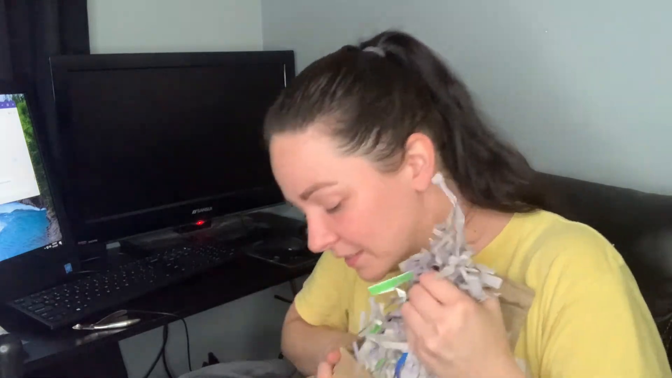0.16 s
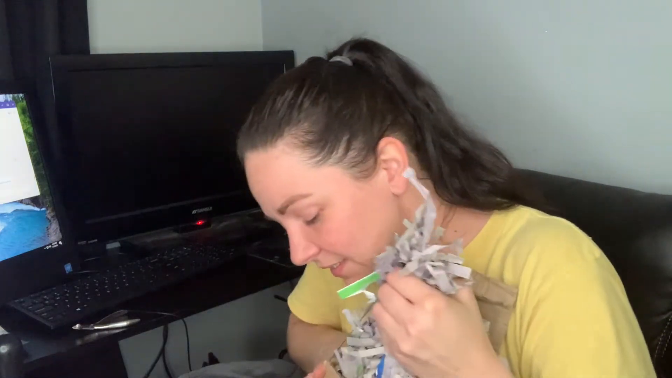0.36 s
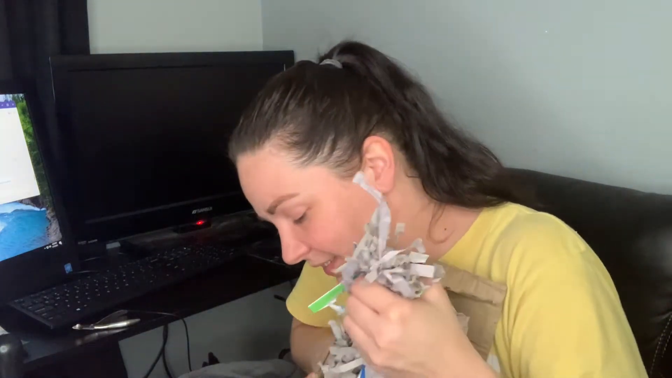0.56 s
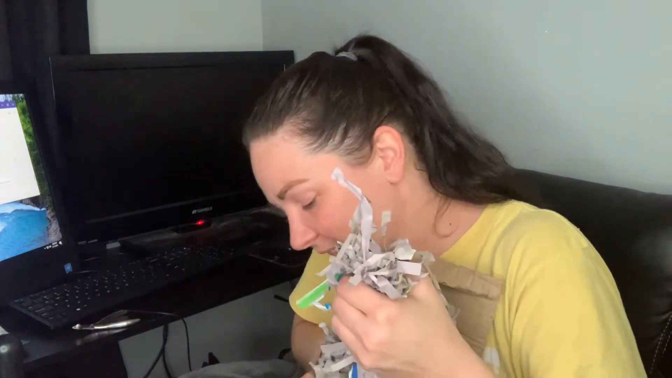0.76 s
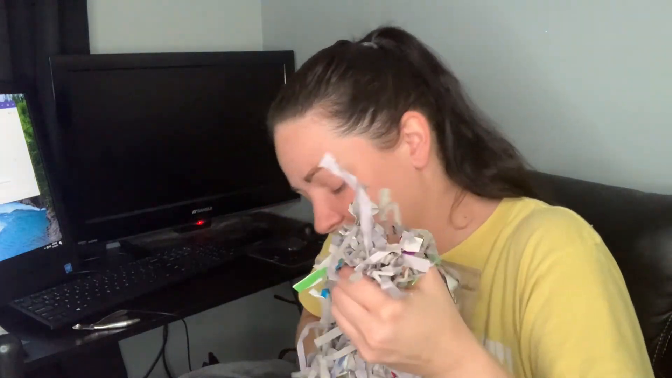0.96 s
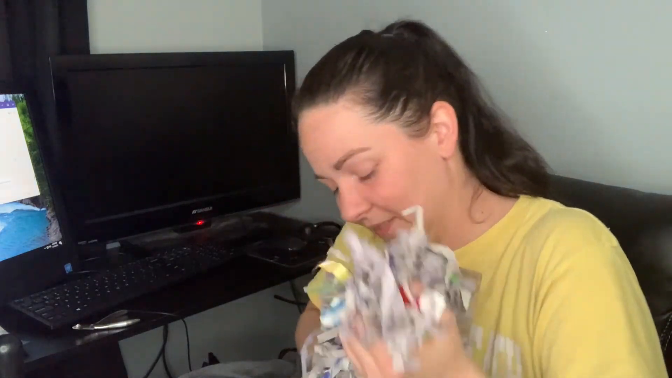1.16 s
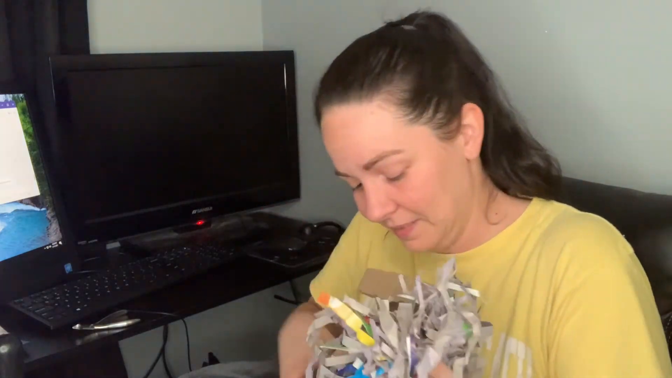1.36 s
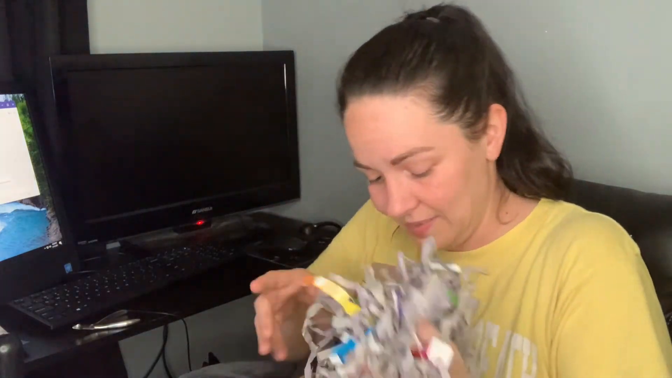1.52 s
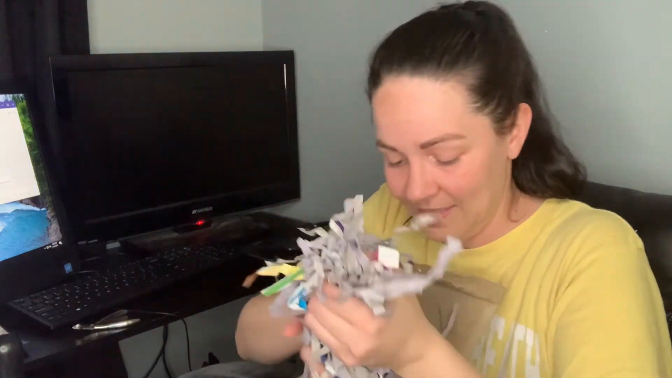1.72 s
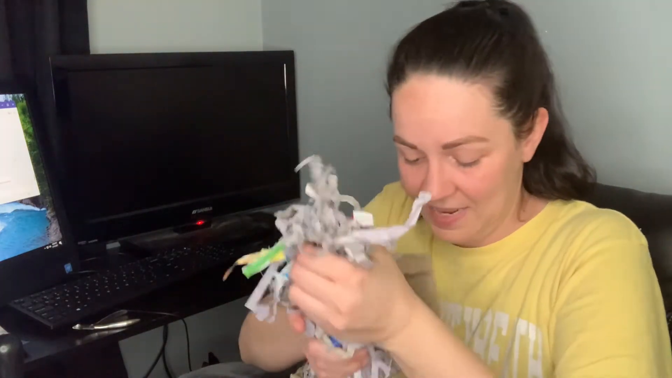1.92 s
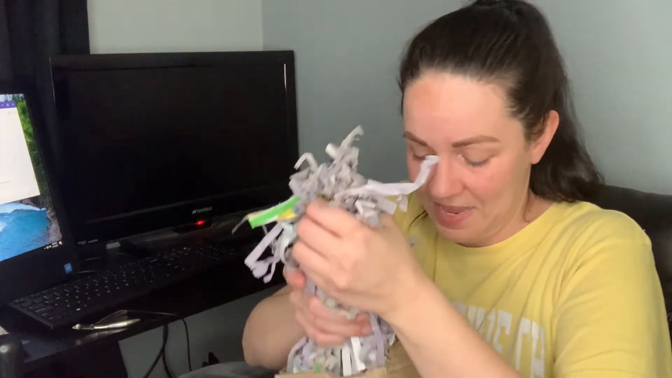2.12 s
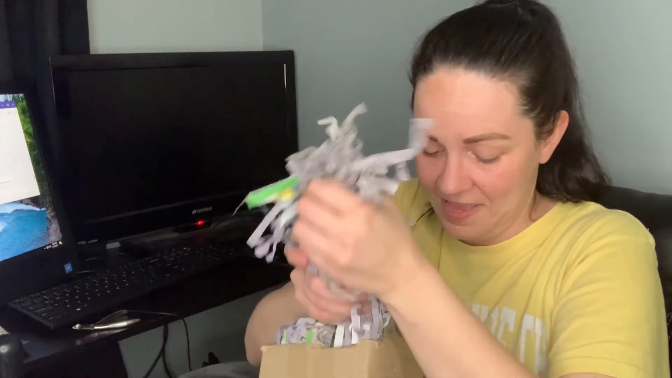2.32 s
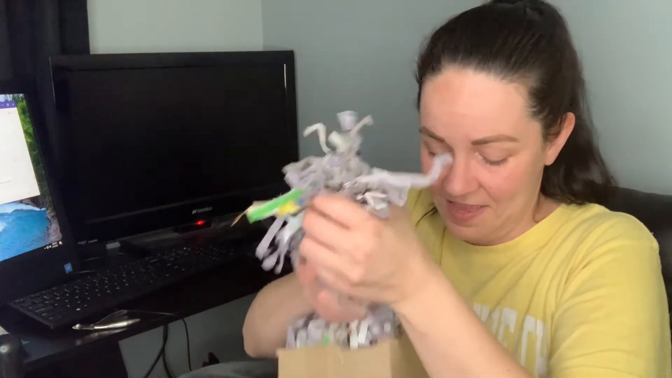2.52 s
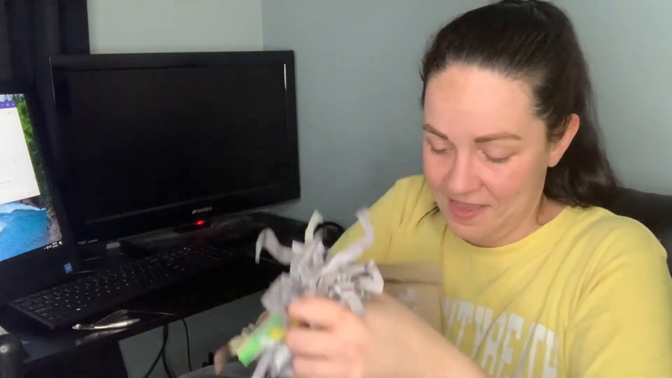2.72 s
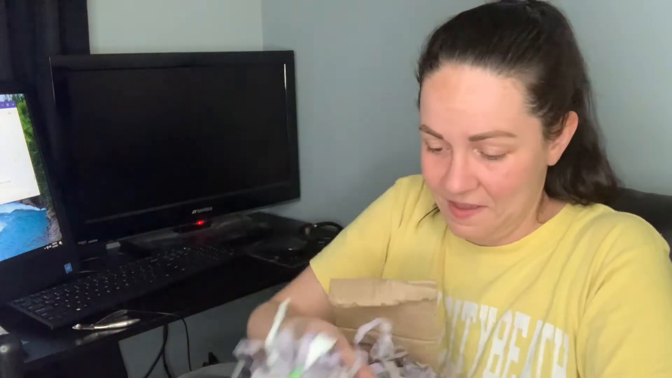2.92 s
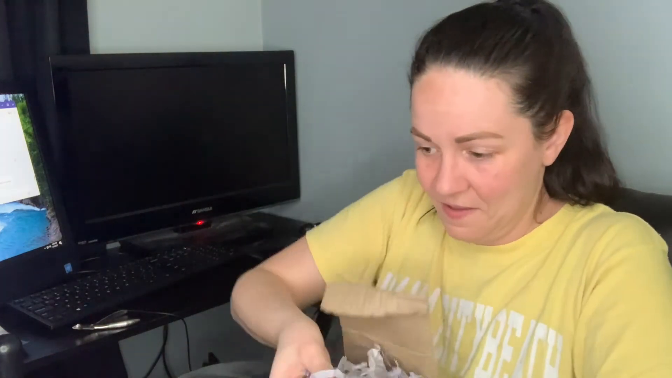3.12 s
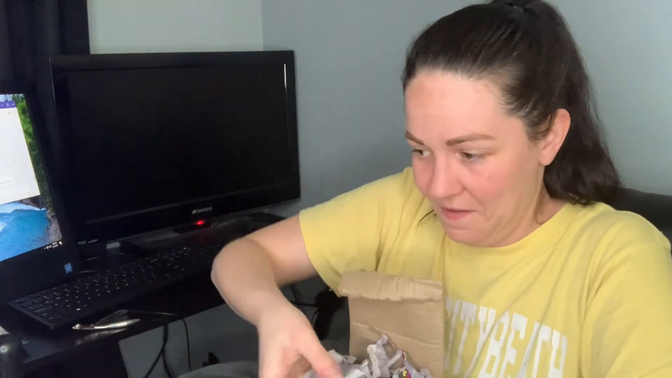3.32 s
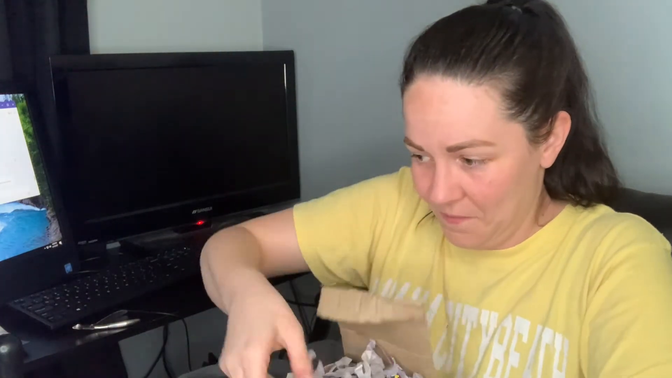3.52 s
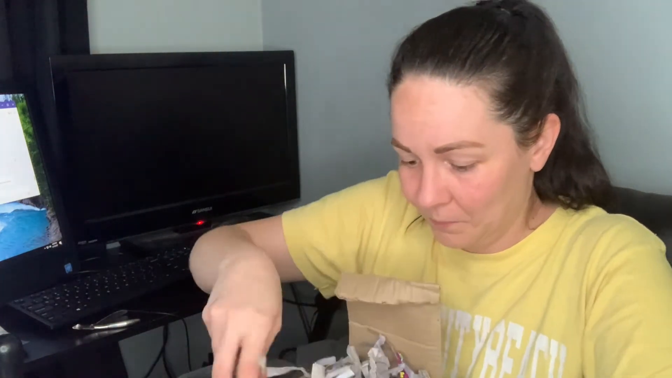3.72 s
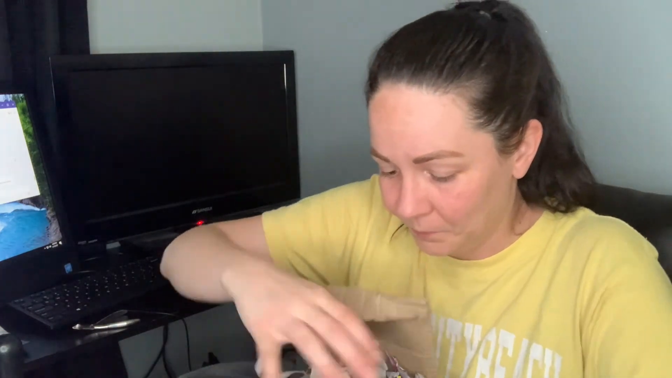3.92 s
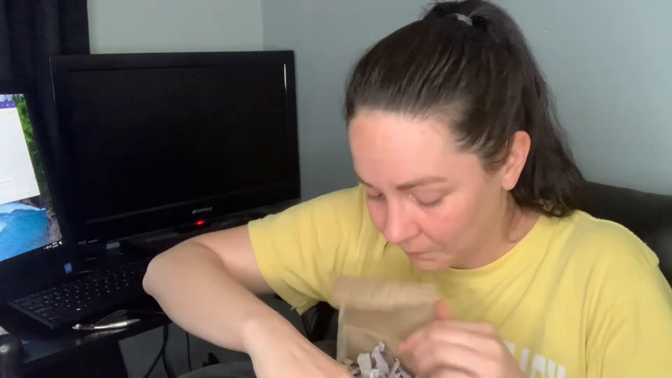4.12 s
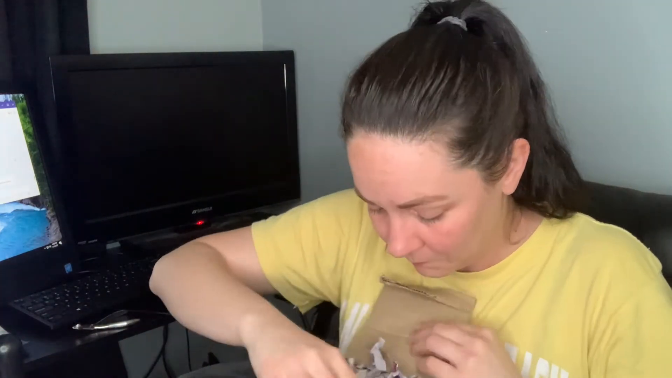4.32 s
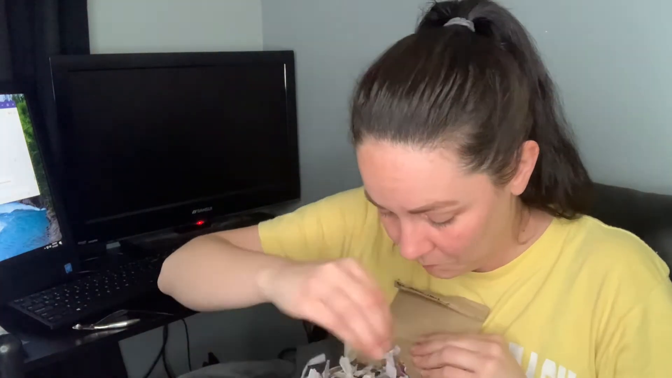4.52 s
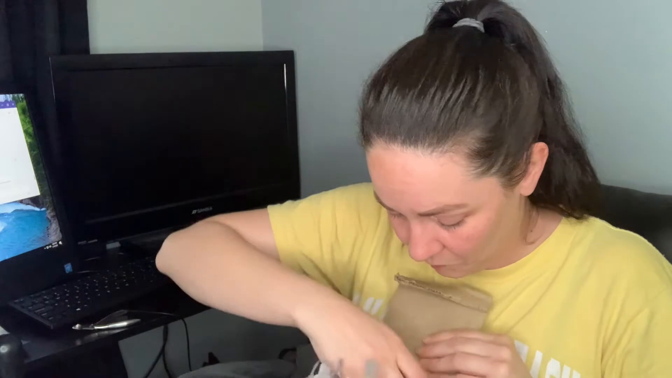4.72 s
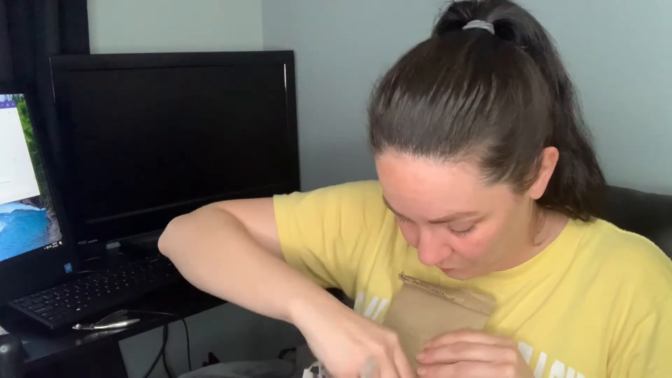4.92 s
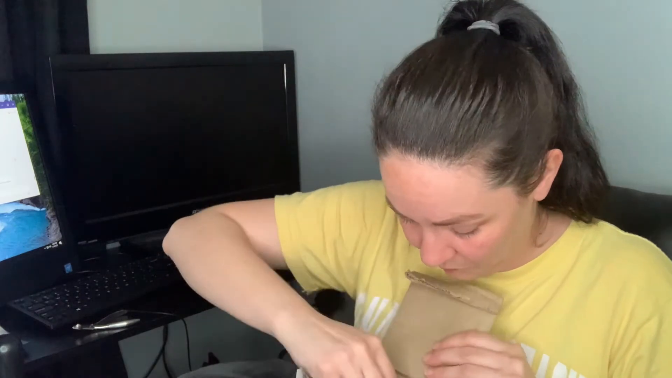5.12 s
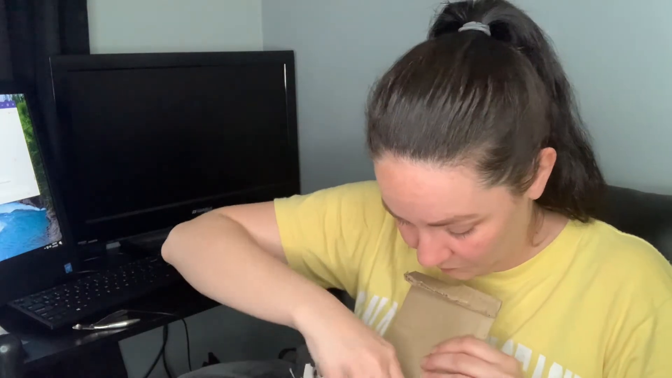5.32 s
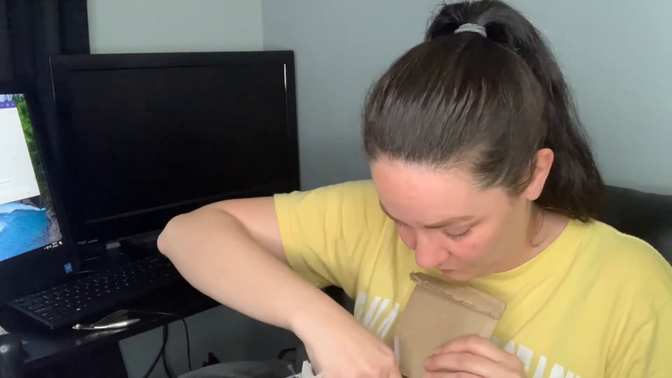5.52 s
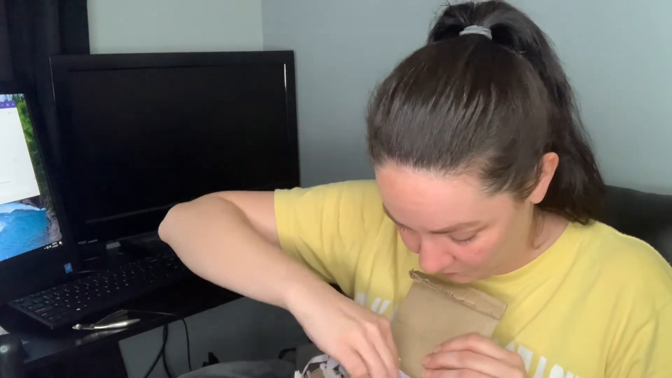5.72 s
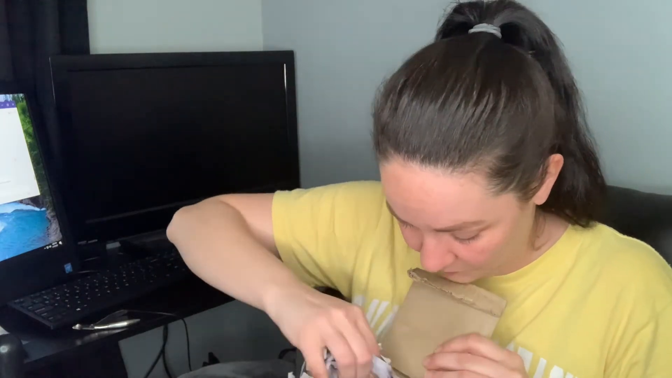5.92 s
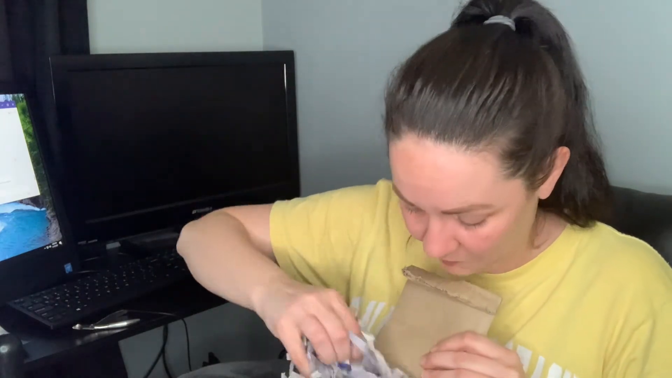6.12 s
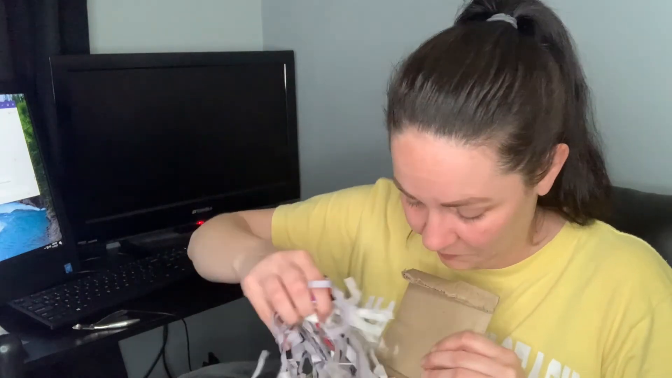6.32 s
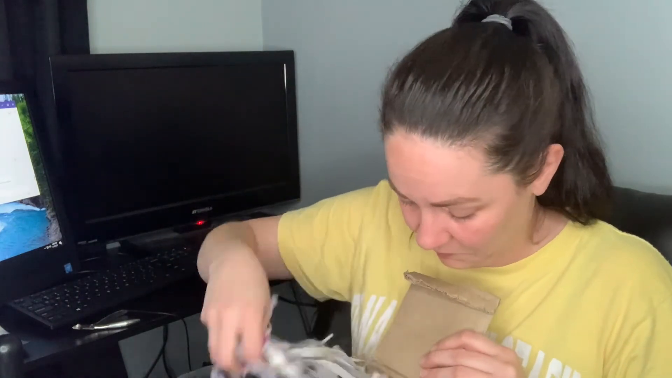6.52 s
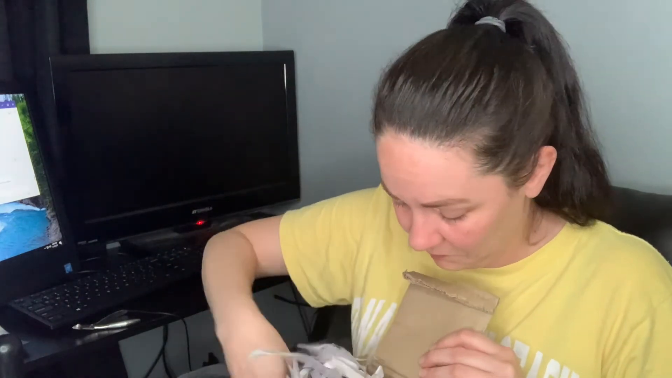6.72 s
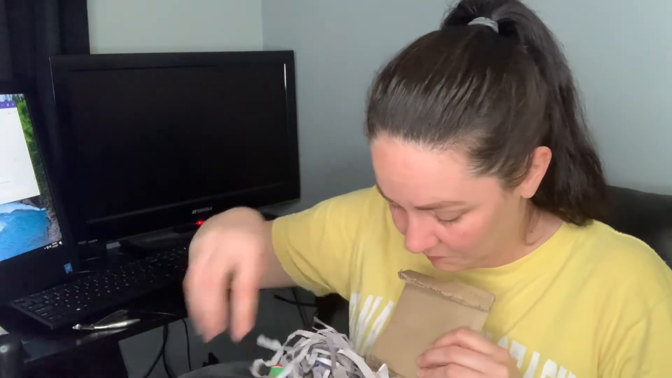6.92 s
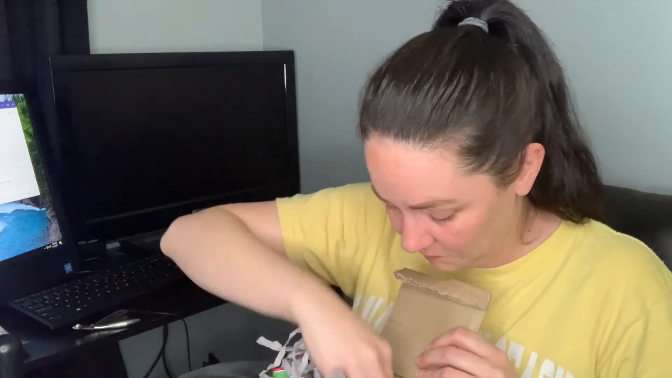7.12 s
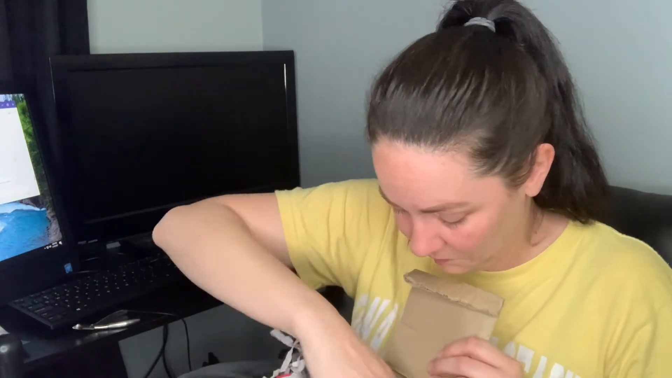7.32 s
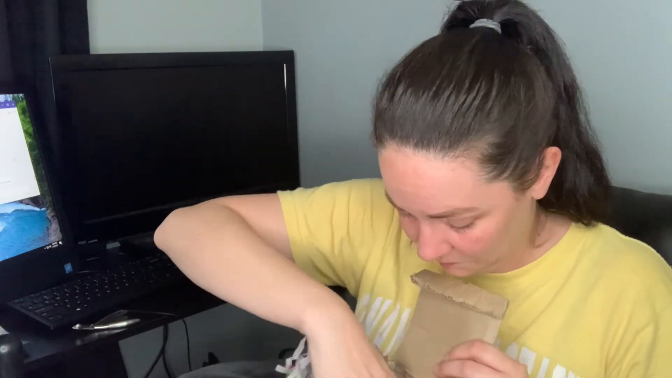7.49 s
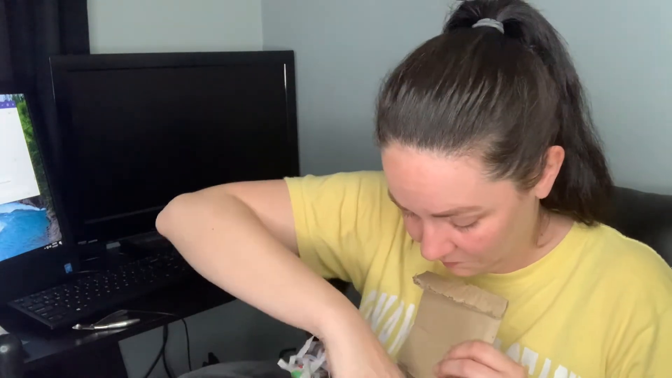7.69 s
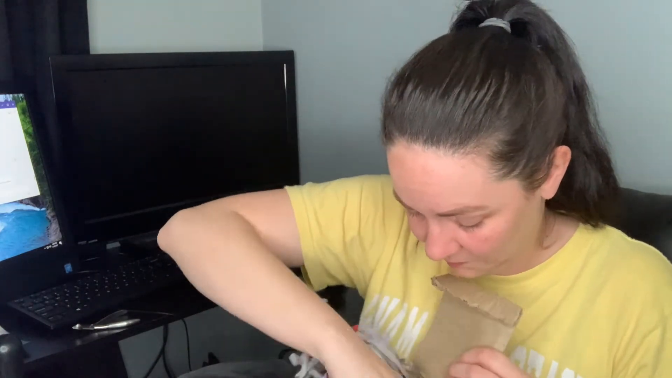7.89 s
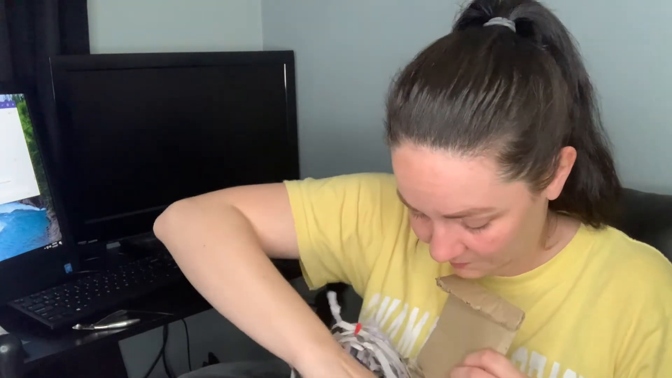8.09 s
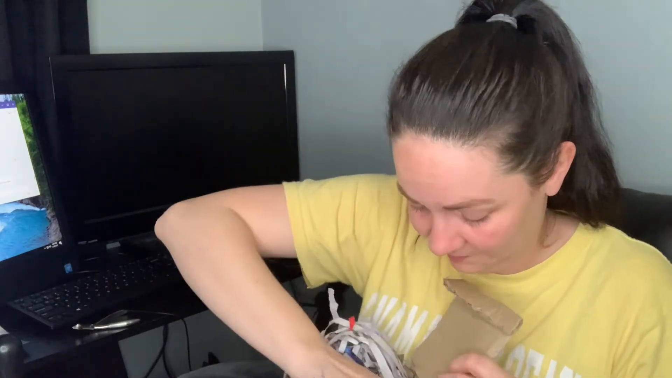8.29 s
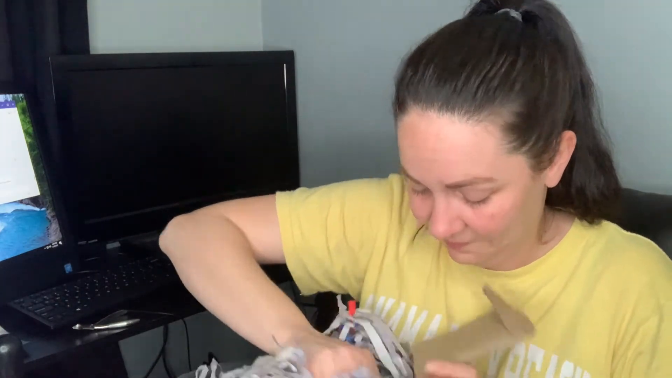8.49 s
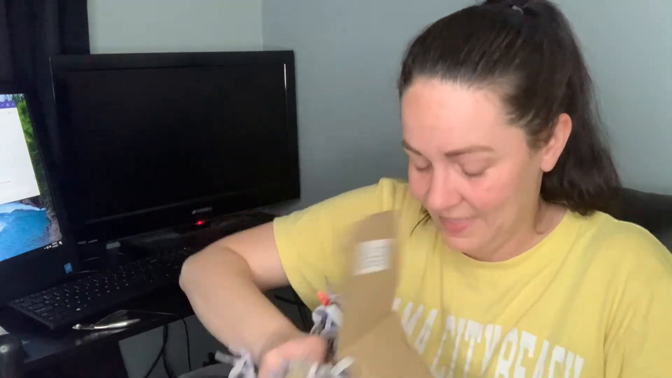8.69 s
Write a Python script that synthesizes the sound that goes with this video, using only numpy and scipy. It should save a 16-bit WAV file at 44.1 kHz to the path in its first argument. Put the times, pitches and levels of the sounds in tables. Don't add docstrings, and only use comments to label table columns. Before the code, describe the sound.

Close, bright rustle of paper strips being lifted and dug through, a single piercing snap, then stiff paper pops and dull cardboard knocks.

```python
import sys
import numpy as np
from scipy import signal
from scipy.fft import rfft, irfft, next_fast_len
from scipy.io import wavfile
from scipy.ndimage import uniform_filter1d, map_coordinates

SR = 44100
rng = np.random.default_rng(int(sys.argv[2]) if len(sys.argv) > 2 else 0)


def natural_amplitude(level_db):
    exponent = np.asarray(level_db, float) / 20
    return 10 ** exponent


def bounce(signal):
    frames = np.transpose(np.atleast_2d(signal))
    limited = np.clip(frames, -1, 1)
    pcm = np.round(limited * 32767).astype(np.int16)
    wavfile.write(sys.argv[1], SR, pcm)


N = 385875


def unit(x):
    return x / np.sqrt(np.mean(x ** 2) + 1e-20)


def along(points, hz):
    f, v = np.transpose(points)
    return np.interp(np.log(hz + 1), np.log(f + 1), v)


def filtered(x, response):
    m = next_fast_len(x.shape[-1] + SR // 4)
    spectrum = rfft(x, m) * response(np.fft.rfftfreq(m, 1 / SR))
    return irfft(spectrum, m)[..., :x.shape[-1]]


def resonant(x, modes):
    def response(f):
        return sum((-1) ** k * natural_amplitude(db) * 1j * f * width / (hz * hz - f * f + 1j * f * width)
                   for k, (hz, width, db) in enumerate(modes))
    return filtered(x, response)


def effort(rows, fall_db_per_s, rise_db_per_s, rest_db=-100):
    steep_start_s, steep_stop_s = 0.029, 0.16
    t = np.arange(0, N + 128, 128) / SR
    start, hold, db = np.transpose(rows)[..., None]
    before = np.clip(start - t, 0, None)
    after = np.clip(t - start - np.abs(hold), 0, None)
    rise = rise_db_per_s * before * (1 + before / steep_start_s)
    fall = fall_db_per_s * after * (1 + after / steep_stop_s)
    power = np.sum(natural_amplitude(db - rise - fall) ** 2, axis=0) + natural_amplitude(rest_db) ** 2
    return np.interp(np.arange(N) / SR, t, 10 * np.log10(power))


def aftermath(blows, under_db, hold_s, fall_db_per_s, steady_db):
    usual_hz = np.median(blows, axis=0)[2]
    rows = [(s, hold_s, db + under_db - 2 * np.log2(hz / usual_hz)) for s, db, hz in blows]
    left_db = effort(rows, fall_db_per_s, rise_db_per_s=6000)
    return np.hypot(natural_amplitude(left_db), natural_amplitude(steady_db))


def ticks(count, spread_db, clump_db, clump_hz, echo_s):
    when, size, late, sign, other = rng.random((count, 5)).T
    knots = rng.standard_normal(int(N * 60 / SR) + 4)
    clumps = map_coordinates(knots, [when * N / SR * np.clip(clump_hz, 1, 60)])
    size = natural_amplitude(-spread_db * np.log(size + 0.0021) + clump_db * clumps)
    first = (when * N).astype(int)
    second = np.minimum(first + (late * echo_s * SR).astype(int), N - 1)
    return np.array([np.bincount(first, size * np.sign(sign - .5), N),
                     np.bincount(second, size * np.sign(other - .5), N)])


def grains(count, hz, octaves, cycles, spread_db, size=48):
    when, loud, late, turn = rng.random((count, 4)).T[..., None]
    pitch = np.clip(hz * 2 ** (octaves * rng.standard_normal((count, 1))), 800, 15500)
    t = np.arange(size) / SR
    decay_db = -60 * t * pitch / (2 * cycles)
    wave = natural_amplitude(-spread_db * np.log(loud + 0.014) + decay_db) * np.sin(2 * np.pi * pitch * t)
    first = (when * N).astype(int) + np.arange(size)
    second = first + (late * .002 * SR).astype(int)
    turned = wave * np.sign(turn - .5)
    return unit(np.array([np.bincount(first.ravel(), wave.ravel(), N + SR)[:N],
                          np.bincount(second.ravel(), turned.ravel(), N + SR)[:N]]))


def patchy(x, depth_db):
    z = signal.stft(x, nperseg=256)[2]
    field = uniform_filter1d(rng.standard_normal(z.shape[1:]), size=14, axis=0)
    field = uniform_filter1d(field, size=5, axis=1)
    return signal.istft(z * natural_amplitude(depth_db * unit(field)), nperseg=256)[1][:, :N]


def knocks(events, t60_s, drier, sharpness, first_db, trim_db):
    out = np.zeros((2, N + SR))
    t = np.arange(SR // 6) / SR
    for s, db, hz in events:
        life_s = np.clip(t60_s * natural_amplitude(drier * (-30 - db)), .002, .5)
        push = natural_amplitude(-60 * t / life_s) * rng.standard_normal((2, len(t)))
        push[0, 0] = natural_amplitude(first_db) * np.sqrt(SR / hz)
        mode = signal.iirpeak(np.clip(hz, 40, 15000), np.clip(sharpness, .4, 9), SR)
        ring = signal.lfilter(*mode, signal.lfilter(*mode, push))
        out[:, round(s * SR):][:, :len(t)] += natural_amplitude(db + trim_db) * ring / np.abs(ring[0]).max()
    return out[:, :N]


# frequency in Hz, density in dB per Hz.
HUSH_COLOUR = [(25, -18), (50, 23), (120, 13), (400, -24), (1500, -31), (6000, -20), (15600, -45)]


def hush():
    noise = rng.standard_normal((2, N))
    return natural_amplitude(-76.0) * unit(filtered(noise, lambda hz: natural_amplitude(along(HUSH_COLOUR, hz))))


# frequency in Hz, t60 in seconds.
ROOM_T60 = [(150, 0.14), (1500, 0.13), (10000, 0.13)]


def room(x):
    hz, t, z = signal.stft(rng.standard_normal((2, SR // 3)), SR, nperseg=256)
    tail = signal.istft(z * natural_amplitude(-60 * t / along(ROOM_T60, hz)[:, None]), SR, nperseg=256)[1]
    late = np.pad(x, ((0, 0), (200, 0)))
    return signal.fftconvolve(late, tail / np.linalg.norm(tail[0]), axes=1)[:, :N]


# start in seconds, hold in seconds, level in dB, crispness in dB.
LIFTING = [(-.031, 0.0059, -43, -2), (.09, 0.013, -48, 5), (.146, 0.075, -45.5, 4), (.262, 0.17, -40.5, 0),
           (.49, .002, -39, 0.5), (.575, 0.014, -38.5, 1), (.64, 0.025, -49.5, 5), (.726, 0.042, -38, -2),
           (.78, 0.061, -32, 2.5), (.94, 0.21, -42, 0), (1.12, 0.031, -40, -1), (1.2, 0.052, -39, 0),
           (1.28, 0.0021, -38.5, -17), (1.41, 0.075, -57.5, 0.5), (1.47, 0.061, -52, 3.5),
           (1.545, 0.077, -44.5, -5), (1.626, 0.065, -39, 2), (1.763, 0.12, -39, -0.5),
           (1.947, 0.15, -42.5, -1), (2.16, 0.045, -44, 0), (2.28, 0.087, -42, 1), (2.42, .03, -47, -5),
           (2.49, 0.036, -48, 0), (2.566, 0.046, -38, -0.5), (2.666, 0.089, -38, -1.5),
           (2.855, 0.047, -39.5, -1.5), (2.92, .11, -40.5, 1.5), (3.1, 0.069, -47.5, 0.5),
           (3.2, .1, -37.5, 1), (3.33, 0.1, -41.5, 1), (3.416, 0.12, -43, 2), (3.616, 0.15, -52, 2),
           (3.82, 0.04, -54, -3), (3.917, 0.017, -49.5, -2), (3.993, 0.061, -45.5, 2.5),
           (4.1, 0.18, -42.5, 1.5), (4.36, 0.011, -47.5, 3.5), (4.456, 0.064, -66, 3)]
DIGGING = [(4.53, 0.0093, -70, -1), (4.605, .01, -76, -4), (4.63, 0.025, -47, 7), (4.66, 0.08, -41, 0.5),
           (4.76, 0.15, -42.5, 0), (4.945, 0.054, -36.5, 3), (5.06, 0.021, -49, 0), (5.14, 0.1, -44, 2.5),
           (5.31, 0.029, -42.5, 0), (5.411, 0.075, -45, -0.5), (5.49, 0.0075, -53, 3),
           (5.55, 0.02, -50, 4.5), (5.62, 0.17, -47, -0.5), (5.778, 0.088, -44, -1),
           (5.98, 0.059, -42.5, 3), (5.997, 0.014, -52.5, 8), (6.11, 0.13, -39.5, 2.5),
           (6.14, 0.045, -38.5, 9.5), (6.287, 0.066, -41, 2.5), (6.42, 0.014, -50, 6.5),
           (6.468, 0.17, -41, 3.5), (6.66, 0.09, -45, 0.5), (6.78, 0.1, -52, 4), (6.9, 0.15, -52.5, -1),
           (7.055, 0.032, -47, -15), (7.105, .075, -49, 5.5), (7.19, 0.019, -41, 3),
           (7.25, 0.07, -45.5, -2), (7.37, .004, -42.5, -4), (7.425, 0.051, -47.5, -7),
           (7.518, 0.11, -47, -2), (7.69, 0.076, -42.5, -1.5), (7.8, 0.063, -45.5, -3),
           (7.895, 0.044, -42, 1), (8.0, 0.068, -45, -2), (8.08, 0.08, -46, -3.5),
           (8.24, 0.25, -44.5, -0.5), (8.41, 0.032, -60, 15), (8.457, 0.0089, -46.5, 1),
           (8.55, 0.037, -48.5, 3), (8.62, 0.071, -49, -3), (8.68, .04, -46.5, 0), (8.738, 0.02, -41.5, -2)]
# time in seconds, grip on the bag in dB, push on the walls in dB.
CONTACT = [(.25, 4, -11.5), (.6, -8.5, -17), (1.2, -6.5, -13.5), (1.75, -20, -16.5), (2.35, -5, -15.5),
           (3.0, -30, -19.5), (3.52, -1.5, -17), (3.62, -32, -23), (3.95, -14, -20.5), (4.75, -9, -19),
           (5.45, -2.5, -17.5), (5.7, 2, -17.5), (6.3, -2.5, -13.5), (6.45, -52, -17.5), (6.95, -21, -16.5),
           (7.2, -2.5, -11), (8.2, -8.5, -15.5), (8.75, -11, -17.5)]


def hands(column=None, crisp=False):
    strokes = [(s, hold, db + crisp * crisp_db)
               for s, hold, db, crisp_db in list(LIFTING) + list(DIGGING)]
    db = effort(strokes, fall_db_per_s=132 if crisp else 103, rise_db_per_s=154, rest_db=-89)
    if column is None:
        return db
    rows = np.array(CONTACT)
    return db + np.interp(np.arange(N) / SR, rows[:, 0], rows[:, column])


# start in seconds, peak in dB, centre in Hz.
JOLTS = [(.009, -43, 138), (.241, -47, 145), (.3, -55, 53.8), (1.277, -54, 120), (1.622, -49, 112),
         (2.565, -47, 103), (2.615, -46, 110), (2.66, -54, 100), (2.701, -50, 80.5), (2.725, -48, 110),
         (3.868, -54, 102), (3.929, -57, 87), (4.0, -57, 110), (1.06, -55, 101), (4.96, -71, 100),
         (5.2, -57, 110), (5.33, -66, 70), (4.1, -45, 94.5), (4.668, -51.5, 99), (5.474, -55, 72),
         (6.332, -58.5, 129), (6.656, -43, 130), (6.769, -58, 59.2), (7.096, -55.5, 149),
         (7.369, -45, 88.5), (8.595, -62, 170)]
# frequency in Hz, width in Hz, level in dB.
LAP_MODES = [(61, 23, 6), (103, 56, -12), (129, 260, -2.5)]


def lap():
    rocking = resonant(resonant(rng.standard_normal((2, N)), LAP_MODES), [(100, 300, 0)])
    gain = aftermath(JOLTS, under_db=-6, hold_s=0.047, fall_db_per_s=260, steady_db=-74)
    return (natural_amplitude(4.0) * gain * unit(rocking)
            + knocks(JOLTS, t60_s=0.062, drier=0.53, sharpness=1.04, first_db=-2, trim_db=7.5))


# start in seconds, peak in dB, centre in Hz.
BUMPS = [(.004, -31.5, 596), (.019, -42, 265), (.208, -28, 404), (.246, -41, 270), (.774, -35, 606),
         (1.061, -29.5, 390), (1.28, -38, 345), (1.623, -34, 292), (2.154, -33.5, 450), (2.353, -34.5, 410),
         (2.564, -31.5, 340), (2.585, -39, 228), (2.62, -53, 232), (2.67, -40, 298), (2.696, -30, 404),
         (2.745, -52, 320), (4.099, -21, 466), (4.109, -29, 286), (4.648, -30, 305), (4.939, -53, 365),
         (5.14, -41, 208), (5.187, -34, 290), (6.14, -46, 307), (6.653, -32, 271), (6.672, -56, 260),
         (3.79, -47, 342), (3.87, -48, 296), (7.101, -32, 324), (7.3685, -21.5, 312), (7.385, -40, 197),
         (7.399, -54, 230), (7.688, -40, 300), (8.464, -35.5, 410), (8.362, -38, 390), (8.475, -35, 483),
         (8.571, -46, 404)]
# frequency in Hz, width in Hz, level in dB.
WALL_MODES = [(203, 290, -5), (308.4, 83, 4), (416, 80, 3), (628, 62, 0.5)]


def walls():
    shoves = ticks(count=3000, spread_db=2, clump_db=0.0, clump_hz=9.8, echo_s=0.0026)
    ring = resonant(resonant(shoves, WALL_MODES), [(320, 560, 0)])
    gain = aftermath(BUMPS, under_db=-22.5, hold_s=0.012, fall_db_per_s=160,
                     steady_db=hands(column=2))
    return (gain * unit(ring)
            + knocks(BUMPS, t60_s=0.061, drier=0.65, sharpness=1.7, first_db=10, trim_db=-3.0))


# start in seconds, peak in dB, centre in Hz.
POPS = [(.225, -29, 1790), (.294, -34, 1180), (1.156, -27, 1610), (1.275, -34, 1200), (.7, -31, 1480),
        (1.071, -33, 1310), (1.626, -36, 870), (2.163, -33, 1420), (2.561, -31, 1430), (2.696, -31.5, 970),
        (2.98, -32, 1300), (3.197, -44, 1470), (3.392, -30.5, 1600), (3.79, -52, 1000), (3.875, -43, 1220),
        (4.373, -39.5, 1420), (4.099, -18, 740), (4.099, -16.5, 1880), (4.105, -22, 616), (4.124, -45, 596),
        (4.646, -17, 1320), (4.634, -30, 1290), (4.738, -26, 1290), (4.849, -31, 1560), (4.96, -35, 1440),
        (4.9415, -22.5, 1350), (5.006, -26, 1900), (5.206, -19.5, 1090), (5.198, -28, 864),
        (5.213, -35, 1160), (5.233, -36, 1150), (5.275, -31, 960), (5.295, -27, 1250), (5.31, -23, 1480),
        (5.325, -22, 1380), (5.338, -25, 1400), (5.352, -32, 1440), (5.391, -29.5, 1070), (5.45, -50, 1450),
        (5.47, -36, 1540), (5.495, -24, 1480), (5.515, -38, 1407), (5.781, -38, 1300), (6.172, -28, 1480),
        (6.219, -26, 1180), (6.277, -22.5, 750), (7.042, -29, 2210), (7.099, -16.5, 1220),
        (7.106, -18, 905), (7.113, -31, 1260), (7.171, -35, 1000), (7.205, -34, 1480), (7.22, -29, 1500),
        (7.362, -15, 1320), (7.672, -40, 1420), (7.697, -30, 970), (8.348, -36, 1400), (8.455, -27.5, 1090),
        (8.742, -37, 1000)]
# frequency in Hz, width in Hz, level in dB.
BAG_MODES = [(726, 630, 4), (1180, 180, 9), (1480, 174, 7), (1610, 53, -1)]


def bag():
    buckles = ticks(count=14000, spread_db=0.5, clump_db=0.5, clump_hz=25.6, echo_s=0.00296)
    ring = resonant(patchy(buckles, depth_db=5.0), BAG_MODES)
    gain = aftermath(POPS, under_db=-17.5, hold_s=0.0033, fall_db_per_s=175,
                     steady_db=hands(column=1))
    return (natural_amplitude(-7.5) * gain * unit(ring)
            + knocks(POPS, t60_s=0.061, drier=0.53, sharpness=2.22, first_db=6.0, trim_db=-6.0))


# peak in dB, tail re peak in dB, tail t60 in seconds.
SNAP = (-2.5, -32, .1)
# frequency in Hz, level in dB, t60 in seconds.
SNAP_MODES = [(1800, -15, 0.006), (5100, -4, 0.0035), (6150, 0, 0.004), (7400, 1, 0.003), (8700, -2, 0.003),
              (11200, -14, 0.006)]
SNAP_S = .4777


def snap():
    in_step_s = .0004
    peak_db, tail_db, tail_t60_s = SNAP
    t = np.arange(SR // 8) / SR
    ring = np.zeros((2, len(t)))
    for hz, db, t60_s in SNAP_MODES:
        phase = [[.08], [1]] * rng.random((2, 1))
        ring = ring + natural_amplitude(db - 60 * t / t60_s) * np.cos(2 * np.pi * (hz * (t - in_step_s) + phase))
    ring = ring * [[1], [.4]] * (1 - np.exp(-t / .0003)) ** 2
    scatter = unit(resonant(rng.standard_normal((2, len(t))), [(7160, 11000, 0)]))
    burst = ring / np.abs(ring[0]).max() + natural_amplitude(tail_db - 60 * t / tail_t60_s) * scatter
    out = np.zeros((2, N))
    out[:, round(SNAP_S * SR):][:, :len(t)] = natural_amplitude(peak_db) * burst
    return out


# start in seconds, peak in dB,
# centre in Hz.
CREASES = [(.2239, -30, 12200), (.25, -27, 3500), (.3431, -27, 12700), (.7005, -29, 12200),
           (.7307, -31, 2050), (.5676, -31, 12500), (1.285, -38, 4500), (1.4157, -43, 12500),
           (1.4686, -48, 6500), (1.6242, -48, 2140), (1.8103, -27, 12500), (1.8804, -26, 12700),
           (2.1635, -33, 12800), (2.5626, -32, 6490), (2.9796, -32, 2030), (3.22, -33, 12500),
           (3.69, -46, 13500), (3.79, -49, 1800), (3.868, -41, 3950), (3.916, -30, 12000),
           (3.917, -43, 3500), (3.9943, -52, 6550), (4.0979, -34, 2670), (4.0979, -18, 12500),
           (4.5296, -45, 6200), (4.53, -51, 12000), (4.5986, -43, 6950), (4.599, -43, 12500),
           (4.61, -60, 3000), (4.6202, -29, 11600), (4.6454, -25.5, 3470), (4.678, -31, 6920),
           (4.966, -36, 3600), (4.9415, -43, 2480), (4.9332, -31, 12500), (5.006, -19.5, 12800),
           (5.006, -37, 5500), (5.955, -48, 2460), (5.954, -40, 5960), (5.7813, -42, 12700),
           (5.955, -39, 12900), (5.997, -23, 12500), (6.1035, -33, 12500), (6.4078, -42, 2710),
           (6.4667, -43, 12500), (6.5375, -31, 12500), (6.788, -39, 4620), (6.171, -24, 12900),
           (7.0433, -29.5, 2900), (7.045, -40, 4500), (7.363, -31, 3500), (7.365, -37, 6540),
           (7.363, -30, 12500), (7.5128, -37, 4770), (7.8256, -31, 7000), (8.3464, -29, 5950),
           (7.8948, -26.5, 12400), (7.925, -32, 12900), (7.949, -35, 11400), (8.4597, -40, 12200),
           (8.48, -16, 11900)]
MORE_CREASES = [(7.3455, -46, 13000), (7.367, -31, 13500), (7.3665, -44, 4900), (2.3, -37, 2300),
                (4.3, -38, 2300), (7.949, -28, 10000), (5.5, -33, 13500), (5.0065, -32, 3500), (8, -32, 3000),
                (8.481, -39, 4300), (8.74, -42, 2300), (4.0979, -33, 4200), (7.1205, -45, 7600), (.7, -40, 5400),
                (6.3, -36, 1600), (7.0435, -42, 3800), (8.481, -35, 1830), (8.348, -43, 2700), (5.4, -36, 12500),
                (5.6, -33, 10000), (4.942, -44, 2100)]


def creases():
    return (knocks(CREASES, t60_s=0.009, drier=0.5, sharpness=1.2, first_db=4, trim_db=3.5)
            + knocks(MORE_CREASES, t60_s=.008, drier=.3, sharpness=1.4, first_db=4, trim_db=9))


# frequency in Hz, density in dB per Hz.
STRIP_COLOUR = [(150, -16.5), (500, -16.5), (1200, -1.5), (2500, -5), (3800, -4), (5000, -5), (8500, -1.5),
                (12000, -2.5), (15600, -3.5)]


def strips():
    crowd = unit(ticks(count=90000, spread_db=2.0, clump_db=1.5, clump_hz=20, echo_s=.002))
    rough = patchy(crowd + rng.standard_normal((2, N)), depth_db=1.5)
    blur = unit(filtered(rough, lambda hz: natural_amplitude(along(STRIP_COLOUR, hz))))
    both = unit(blur
                + natural_amplitude(-13.0) * grains(count=9000, hz=8300, octaves=0.89, cycles=1.5, spread_db=0.5)
                + natural_amplitude(-18.5) * grains(count=1600, hz=3330, octaves=0.83, cycles=1.0, spread_db=1.0)
                + natural_amplitude(-17) * grains(count=400, hz=4500, octaves=.6, cycles=1.1, spread_db=3))
    body = filtered(both, lambda hz: 1 / (1 + (hz / 6500) ** 4))
    top = both - body
    top_gain = natural_amplitude(hands(crisp=True) - 4.5)
    body_gain = natural_amplitude(-48.0) * (natural_amplitude(hands() - 4.5) / natural_amplitude(-48.5)) ** 0.96
    return natural_amplitude(5.0) * (top_gain * top + body_gain * body)


def scene():
    paper = lap() + walls() + bag() + creases() + strips()
    crack = snap()
    return hush() + paper + crack + natural_amplitude(-8.5) * room(paper + natural_amplitude(-5) * crack)


def band_limit(x):
    return signal.sosfilt(signal.butter(12, 17010, fs=SR, output="sos"), x)


# frequency in Hz, then left lead in radians, likeness 0-1,
# or left minus right in dB.
LEAD = [(0, 0), (600, -.8), (1210, -.8), (1810, -1.4), (3360, -2), (6000, -4.75), (7410, -4),
        (8350, -np.pi), (9560, -np.pi), (12900, -.4), (13300, 0), (15000, 0), (15700, .9)]
ALIKE = [(30, 0.9), (90, 0.88), (300, 0.91), (690, 0.15), (1200, 0.48), (2200, 0.84), (3800, 0.41),
         (5000, 0.29), (7400, 0.57), (8400, 0.98), (9500, 0.97), (10000, 0.69), (12300, 0.8)]
TILT = [(60, -2), (150, 0), (380, 0.5), (950, -3.5), (2380, -2), (5980, -1)]
# low edge in Hz, high edge in Hz.
SHARED_BAND = (13200, 15100)


def record(dry):
    hz, t, (same, apart) = signal.stft(dry, SR, nperseg=1024)
    hz = hz[:, None]
    near = np.exp(-((t - SNAP_S) / .025) ** 6)
    one = (hz > SHARED_BAND[0]) & (hz < SHARED_BAND[1])
    turn = np.where(one, .45, 1) * np.arccos(np.clip(along(ALIKE, hz), 0, 1)) / 2
    turn = turn * (1 - .6 * near)
    same, apart = same * np.cos(turn), apart * np.sin(turn)
    wander = 0.029 * map_coordinates(rng.standard_normal(60), [t * 5])
    places = np.broadcast_arrays(hz / 450, t * 14)
    wander = wander + 0.45 * map_coordinates(rng.standard_normal((60, 160)), places, order=1)
    lead = np.interp(hz, *np.transpose(LEAD)) * (1 + wander * np.clip((8000 - hz) / 2000, 0, 1))
    snap_lead_s, snap_tilt_db = 5.2e-5, -3
    snap_lead = 2 * np.pi * hz * snap_lead_s
    lead = np.where(hz < 9560, (1 - near) * lead + near * snap_lead, lead)
    tilt_db = (hz < 8000) * along(TILT, hz) + near * snap_tilt_db
    half = natural_amplitude(tilt_db / 2) * np.exp(.5j * lead)
    band = (hz < 15760) / (1 + (44 / (hz + 1)) ** 5)
    pair = band * np.array([(same + apart) * half, (same - apart) / half])
    ports = signal.istft(pair, SR, nperseg=1024)[1][:, :N]
    return band_limit(ports)


dry = scene()
out = record(dry)
bounce(out)
```